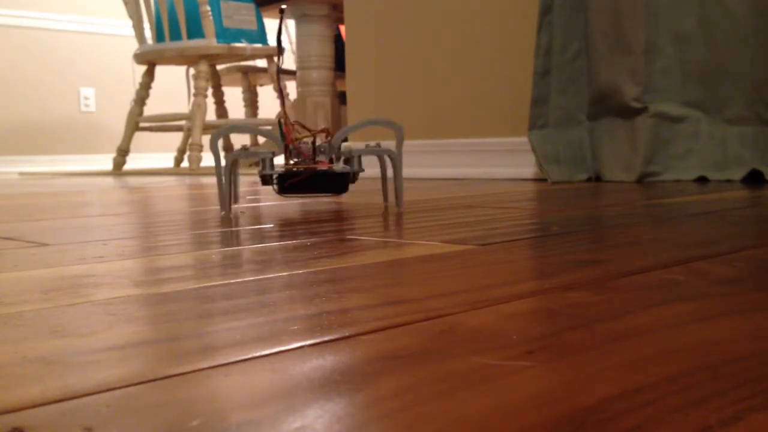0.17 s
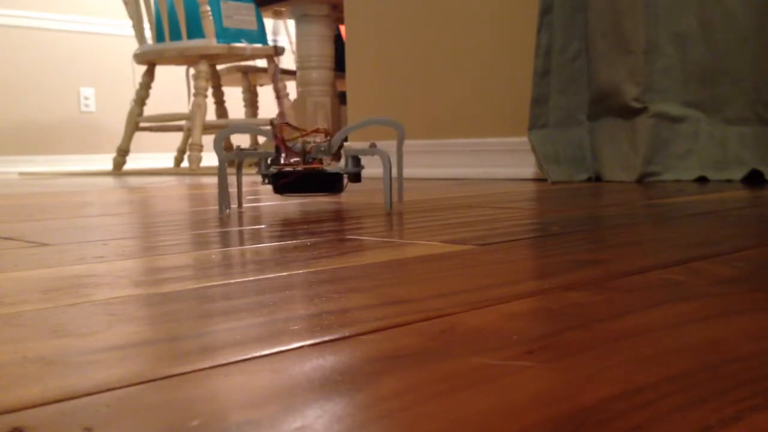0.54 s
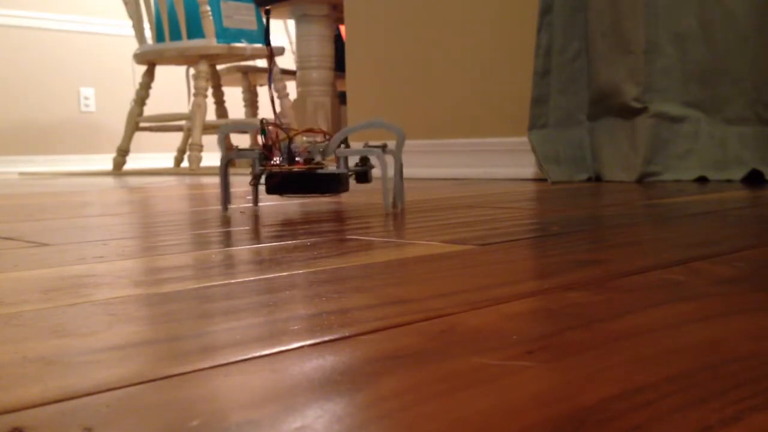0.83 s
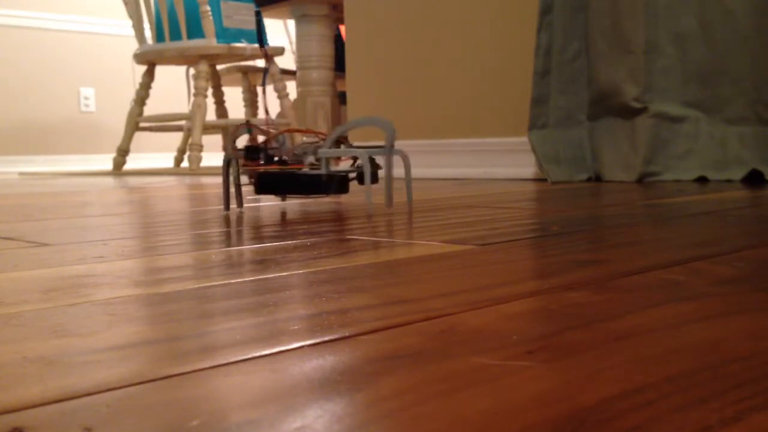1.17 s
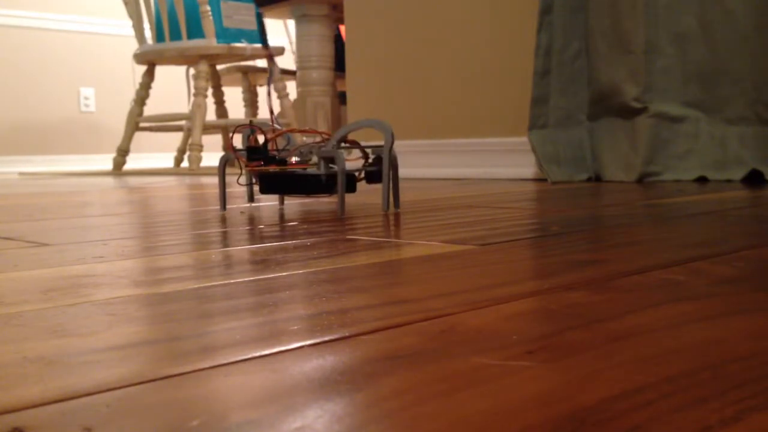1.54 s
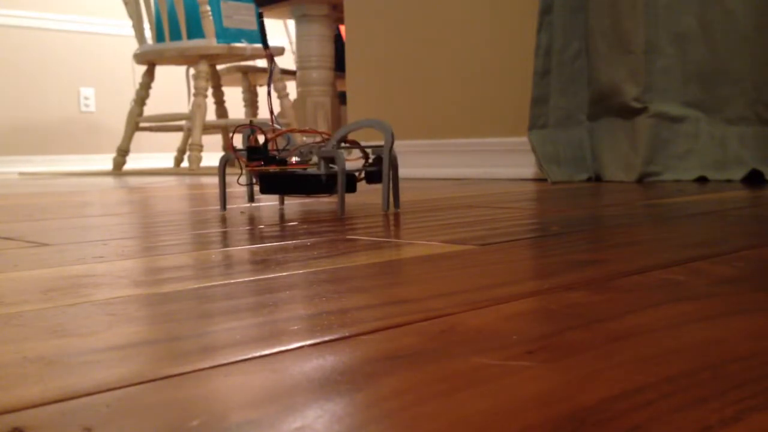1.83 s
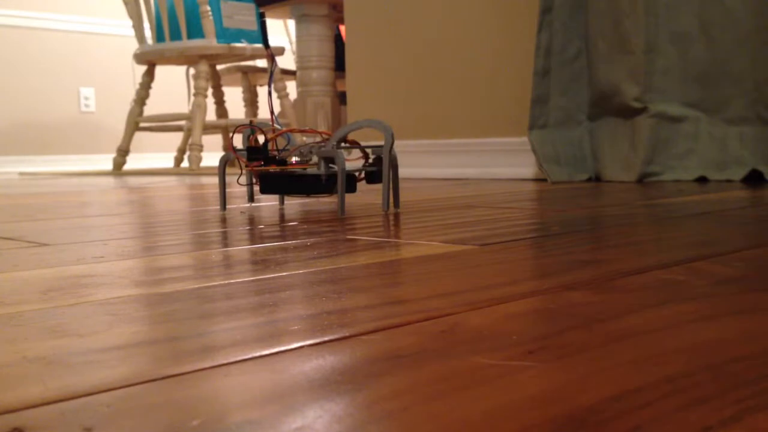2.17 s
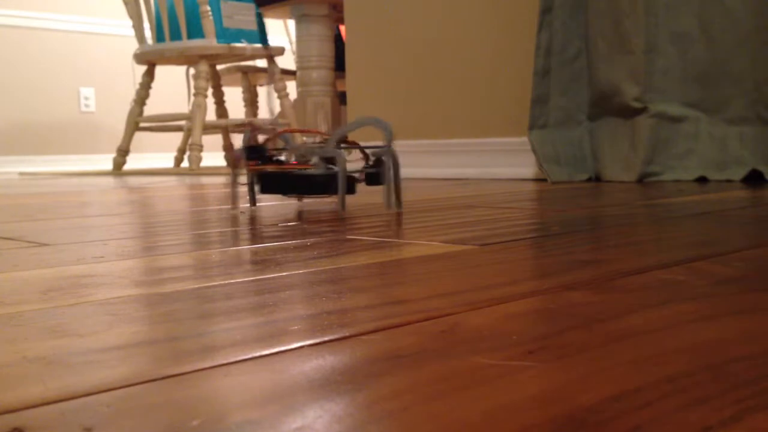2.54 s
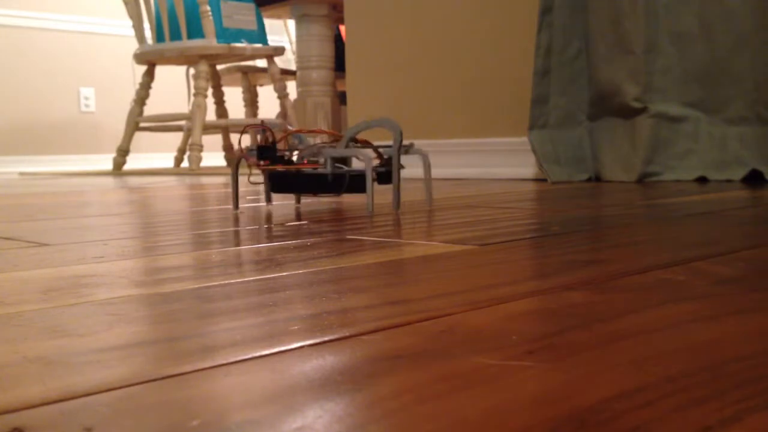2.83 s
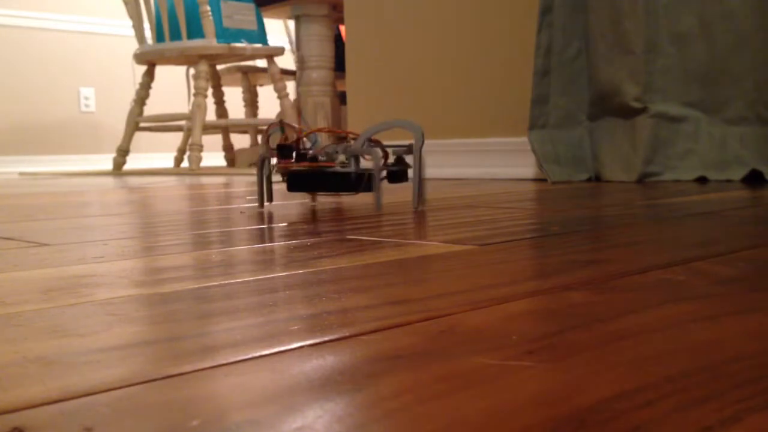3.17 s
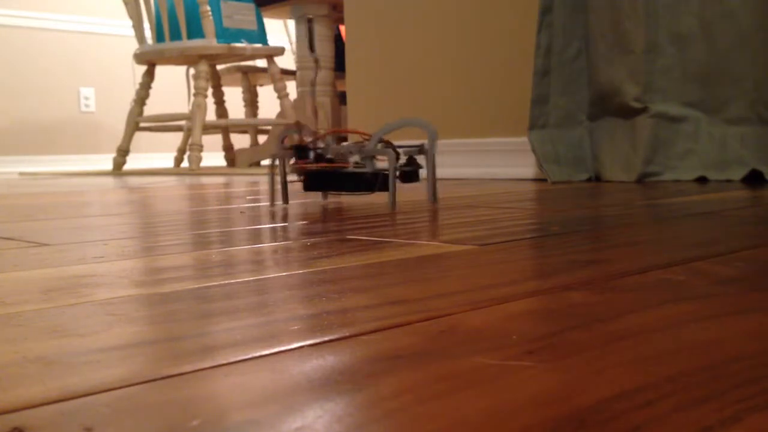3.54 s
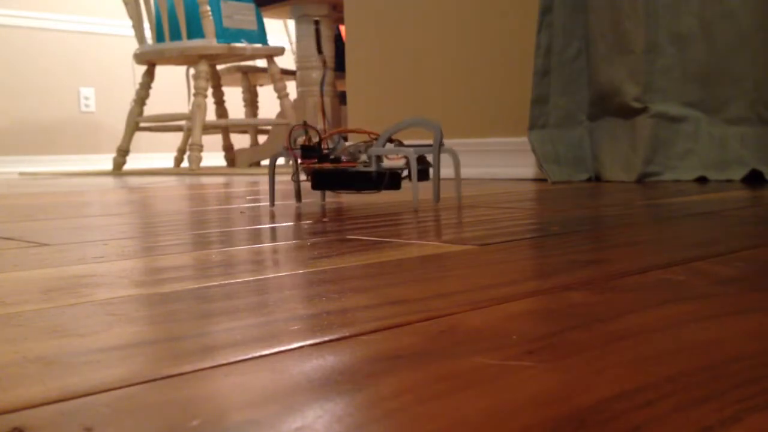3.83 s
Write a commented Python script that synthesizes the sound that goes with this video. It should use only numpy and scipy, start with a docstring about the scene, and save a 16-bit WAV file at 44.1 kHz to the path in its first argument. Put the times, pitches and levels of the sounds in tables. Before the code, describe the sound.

A small walking robot's servos rasp and whine in quick bursts, with light foot knocks on a wooden floor. It rests, ticking faintly, then walks on more strongly with a brief clatter, in a softly humming, slightly echoing room.

```python
"""A small robot walks on wood

A four-legged robot walks, rests for a moment and walks on more strongly. In each stroke a servo
(a geared motor) speeds up and slows down: its teeth rattle and whine, and scrape once per gear turn.
The servos also twitch, squeak and tick. Knocks ring in the floorboards; the room hums and echoes."""
import sys
import numpy as np
from scipy import signal
from scipy.fft import rfft, irfft, next_fast_len
from scipy.io import wavfile
from scipy.ndimage import uniform_filter1d, map_coordinates

SR = 44100
rng = np.random.default_rng(int(sys.argv[2]) if len(sys.argv) > 2 else 0)


def bounce(signal):
    """Save signal as a 16-bit WAV file at the path given by the first command-line argument."""
    frames = np.transpose(np.atleast_2d(signal))
    limited = np.clip(frames, -1, 1)
    pcm = np.round(limited * 32767).astype(np.int16)
    wavfile.write(sys.argv[1], SR, pcm)


N = 176400
KNOCK_RISE_S = 0.0018  # a soft contact takes a moment to build up


def amp(db):
    """Turn decibels into a number to multiply by."""
    return 10 ** (np.asarray(db) / 20)


def unit(x):
    """Scale a signal to an average power of 1."""
    return x / np.sqrt(np.mean(x ** 2) + 1e-20)


def along(points, hz):
    """Read a curve of (pitch_hz, value) points, with pitch on a log scale."""
    pitches, values = np.transpose(points)
    return np.interp(np.log(hz + 1), np.log(pitches + 1), values)


def wobble(rate):
    """A smooth curve through `rate` random values a second."""
    return map_coordinates(rng.standard_normal(int(N * rate / SR) + 4), [np.arange(N) * rate / SR])


def filtered(x, response):
    """Turn each frequency up or down by response(hz)."""
    size = next_fast_len(N + SR // 2)
    return irfft(rfft(x, size) * response(np.fft.rfftfreq(size, 1 / SR)), size)[:N]


def coloured(x, *colours):
    """Shape the tone with (pitch_hz, level_db) curves; white noise keeps its power."""
    size = 8192
    hz = np.fft.rfftfreq(size, 1 / SR)
    gain = unit(amp(sum(along(colour, hz) for colour in colours)))
    # fold the filter so that it rings only after a sound, never before
    cepstrum = irfft(np.log(gain + 1e-6))
    cepstrum[1:size // 2] *= 2
    cepstrum[size // 2 + 1:] = 0
    return signal.fftconvolve(x, irfft(np.exp(rfft(cepstrum))))[:N]


def add(track, start_s, sound):
    """Mix a sound into a track."""
    i = round(start_s * SR)
    track[i:i + len(sound)] += sound[:N - i]


def swells(rows):
    """A loudness curve made of bell-shaped bumps."""
    t = np.arange(N) / SR
    return sum(amp(db) * np.exp(-.5 * ((t - peak_s) / width) ** 2) for peak_s, width, db in rows)


def background():
    """A slightly wavering household hum over soft room noise."""
    # hum tones: pitch_hz, level_db
    tones = [(60, -69.5), (91, -62.5), (120, -59)]
    # colour of the room noise: pitch_hz, level_db
    air = [(15, -34), (25, -35), (43, -18), (125, -5), (146, -10.5), (191, -5.5), (213, -14.5), (344, -12),
           (501, -21.5), (1060, -25.5), (1280, -29), (1540, -29.5), (2780, -32.5), (4260, -32),
           (15000, -39)]
    t = np.arange(N) / SR
    hum = sum(amp(db) * np.sqrt(2) * np.sin(2 * np.pi * hz * t + 0.43 * wobble(3.74)) for hz, db in tones)
    return hum + amp(-56.5 + 1.53 * wobble(11.9)) * coloured(rng.standard_normal(N), air)


def rumbles_and_rustles():
    """Low floor rumbles and faint rustles: noise that swells and fades."""
    # rumbles: peak_s, half_width_s, level_db
    rumbles = [(.43, 0.061, -56.5), (1.205, 0.035, -49)]
    # their colour: pitch_hz, level_db
    rumble_colour = [(25, -20), (55, -1), (135, 1), (220, -14), (500, -36), (2000, -67)]
    # rustles: peak_s, half_width_s, level_db
    rustles = [(1.935, 0.015, -64), (2.12, 0.033, -58), (3.94, 0.03, -53)]
    # their colour: pitch_hz, level_db
    rustle_colour = [(100, -21), (350, 8), (600, 0), (1000, -3.5), (2200, -5), (3200, -16), (10000, -33)]
    rumble = swells(rumbles) * coloured(rng.standard_normal(N), rumble_colour)
    return rumble + swells(rustles) * coloured(rng.standard_normal(N), rustle_colour)


def room_echo(x):
    """Dense early echoes from the walls, and a tail that dies soonest in the treble."""
    # pitch_hz, fade_s (the time to fall by 60 dB)
    fades = [(200, 0.48), (2000, 0.77), (8000, 0.32), (15000, 0.14)]
    tail_db, early_db, early_fade_s = -10, -9, 0.026
    hz, t, noise = signal.stft(rng.standard_normal((2, SR // 2)), SR, nperseg=256)
    tail = signal.istft(noise[0] * amp(-60 * t / along(fades, hz)[:, None]), SR, nperseg=256)[1]
    early = signal.istft(noise[1] * amp(-60 * t / early_fade_s), SR, nperseg=256)[1]
    echo = amp(tail_db) * tail / np.linalg.norm(tail) + amp(early_db) * early / np.linalg.norm(early)
    return signal.fftconvolve(x, np.pad(echo, (SR // 500, 0)))[:N]  # 2 ms late


def footfalls():
    """A foot lands squarely and its plank gives a short woody note."""
    # landings: start_s, pitch_hz, level_db
    landings = [(1.194, 581, -54), (1.224, 580, -52), (2.507, 530, -40), (3.34, 519.3, -47)]
    # tones of a plank: pitch_multiple, level_db, fade_s
    plank = [(1, 3.5, .18), (1.9, 0.5, 0.088), (2.28, -3, 0.15)]
    t = np.arange(SR // 2) / SR
    rise = 1 - np.exp(-t / KNOCK_RISE_S)
    notes = np.zeros(N)
    for start_s, hz, db in landings:
        ring = sum(amp(db + tone_db - 60 * t / fade_s) * np.sin(2 * np.pi * (k * hz * t + rng.random()))
                   for k, tone_db, fade_s in plank)
        add(notes, start_s, rise * ring)
    return notes


def knocks():
    """Each knock on the floor is a dull thud that rings the boards, and a harder clack."""
    # knocks: start_s, thud_db, clack_db
    hits = [(.632, -56, -45.5), (.703, -71, -54), (1.112, -52.5, -48.5), (1.178, -40.5, -55),
            (1.194, -38.5, -58), (1.224, -42.5, -45), (1.351, -72, -43.5), (2.476, -28.5, -51),
            (2.483, -31, -38), (2.507, -32.5, -25.5), (2.515, -33, -28), (2.543, -40, -31),
            (2.572, -38, -39), (2.592, -40.5, -36.5), (2.609, -35, -35), (2.622, -45, -36.5),
            (2.638, -38, -45), (2.664, -46.5, -42.5), (3.015, -55, -46.5), (3.257, -52.5, -45),
            (3.338, -45.5, -52), (3.353, -53, -42), (3.502, -60, -39.5), (3.513, -69, -60)]
    # tones of the floorboards: pitch_hz, level_db, fade_s
    boards = [(247.2, 2.5, 0.45), (347, -6, 0.18), (369.5, 5, 0.26), (434.5, -2.5, 0.35), (534, -12, .3),
              (653, -3, 0.29), (696, -8, .3), (720, -8.5, 0.34), (865, -2, 0.23), (970, -12, 0.15)]
    # colour of a thud: pitch_hz, level_db
    thud_colour = [(70, -22), (190, -4), (250, -2), (305, -5), (370, 1.5), (480, -1.5), (600, -3),
                   (720, -4.5), (950, -8.5), (1150, -13), (2500, -22), (8000, -50)]
    # colour of a clack: pitch_hz, level_db
    clack_colour = [(200, -29), (700, -8.5), (950, 4.5), (1120, -9), (1350, -0.5), (1900, -3.5),
                    (2400, 3.5), (3100, -11), (4200, -6.5), (7000, -12), (15000, -50)]
    thud_fade_s, clack_fade_s, ring_db = 0.088, 0.071, -5
    t = np.arange(SR // 2) / SR
    thuds, clacks, rings = np.zeros((3, N))
    rise = 1 - np.exp(-t / KNOCK_RISE_S)
    for start_s, thud_db, clack_db in hits:
        add(thuds, start_s, rise * amp(thud_db - 60 * t / thud_fade_s) * rng.standard_normal(len(t)))
        add(clacks, start_s, rise * amp(clack_db - 60 * t / clack_fade_s) * rng.standard_normal(len(t)))
        ring = sum(amp(db + rng.normal(0, 1.9) - 60 * t / fade_s)
                   * np.sin(2 * np.pi * (hz * t + rng.random())) for hz, db, fade_s in boards)
        add(rings, start_s, rise * amp(thud_db + ring_db) * ring / np.abs(ring).max())
    return coloured(thuds, thud_colour) + coloured(clacks, clack_colour) + rings


def ticks():
    """Control pulses keep giving the servos tiny kicks, heard best while the robot rests."""
    # colour of a tick: pitch_hz, level_db
    colour = [(500, -10.5), (2200, 5), (2900, -9.5), (4100, 3.5), (5700, -7), (6400, -10.5), (6750, 5),
              (7200, -7), (9300, -5), (9700, 0), (10500, -8), (15000, -11)]
    pulses = [(.002, 5.5), (.0085, 1.5), (0.016, -7)]  # delay_s, level_db
    pulses_per_s, tick_s, level_db = 49.7, 0.002, -68.5
    t = np.arange(N) / SR
    kicks = sum(amp(db) * np.exp(-((t - delay_s) % (1 / pulses_per_s)) / tick_s) for delay_s, db in pulses)
    ticking = kicks * amp(1.4 * wobble(77)) * rng.standard_normal(N)
    return amp(level_db) * unit(coloured(ticking, colour))


def squeaks():
    """Now and then a gear case chirps roughly around the pitch it rings at most."""
    # chirps: peak_s, half_width_s, level_db
    chirps = [(.452, 0.015, -46), (.665, 0.013, -53), (.72, .014, -55), (.96, 0.0031, -39.5),
              (3.588, .005, -47.5)]
    pitch_hz = 2850 * (1 + .03 * wobble(1200) + .02 * wobble(80))
    return swells(chirps) * np.sin(2 * np.pi * np.cumsum(pitch_hz) / SR)


def gear_whine(pitch_hz):
    """Several servos turn unsteadily at nearly the same speed; their meshing teeth whine roughly."""
    # servos moving together: speed_multiple, level_db
    legs = [(.92, -6), (.99, 1), (1.055, -2)]
    # tones of the meshing gears: pitch_multiple, level_db
    tones = [(.5, -18), (1, 1.5), (1.6, -1.5)]
    t = np.arange(len(pitch_hz)) / SR

    def unsteady(rate):
        return np.interp(t * rate, np.arange(SR // 20), rng.standard_normal(SR // 20))

    whine = np.zeros(len(t))
    for speed, leg_db in legs:
        waver = 1 + 0.0224 * unsteady(901) + .038 * unsteady(130)  # fast flutter, slower drag
        cycles = np.cumsum(pitch_hz * speed * waver) / SR
        whine += sum(amp(leg_db + db) * np.sin(2 * np.pi * k * cycles) for k, db in tones)
    return unit(whine)


def tooth_rattle(turns):
    """Gear teeth click with uneven size and spacing over smooth rubbing."""
    clicks_per_turn, scatter_db, rub_db, clump_db = 30, 2.5, 6.5, 4.5
    tooth = np.floor(turns * clicks_per_turn + .25 * wobble(600))
    sizes = amp(scatter_db * np.clip(rng.standard_normal(N), -2, 2))
    clicks = (np.diff(tooth, prepend=0) > 0) * sizes * rng.choice([-1, 1], N)
    chatter = signal.stft(unit(clicks) + amp(rub_db) * rng.standard_normal(N), nperseg=256)[2]
    # each clump of chatter gets its own colour
    clumps = uniform_filter1d(rng.standard_normal(chatter.shape), size=4, axis=0)
    clumps = uniform_filter1d(clumps, size=4, axis=1)
    chatter *= amp(clump_db * np.clip(unit(clumps), -2, 2))
    return unit(signal.istft(chatter, nperseg=256)[1][:N])


def servos():
    """As a servo speeds up, its rattle, scrape and whine grow louder and the whine rises."""
    # strokes: start_s, fastest_s, end_s, base_db, top_turns_per_s, scrape_db, whine_db, whine_hz, bright_db
    strokes = [(-.12, -0.01, .045, -41, 55, -7, -6, 5300, 5),
               (0.102, 0.209, .264, -40, 62, -7, -13, 5920, 6),
               (.332, 0.46, .53, -41.5, 54, 0, -3.5, 5640, 3),
               (0.599, 0.7, .765, -39, 62, -11, -17, 5600, 4.5),
               (0.831, .952, 1.03, -40, 54, 0, -2, 5650, 2.5),
               (1.1, 1.202, 1.265, -37, 58, -2, -7.5, 5740, -0.5),
               (1.335, 1.448, 1.482, -40.5, 56, 0.5, 1.5, 5460, 7),
               (2.367, 2.42, 2.495, -36.5, 68, -15, -1, 6400, 3),
               (2.493, 2.576, 2.65, -32, 61, 3.5, -12, 5420, -1),
               (2.719, 2.816, 2.908, -35.5, 56, -2.5, -2.5, 5350, 2.5),
               (2.982, 3.068, 3.152, -37, 64, 4.5, -1, 5130, 2.5),
               (3.22, 3.337, 3.402, -36, 54, 2.5, -2, 5420, 1),
               (3.482, 3.569, 3.645, -39.5, 63, 6, 4, 5600, 2),
               (3.735, 3.835, 3.9, -33, 55, -1.5, -8.5, 5110, -3),
               (3.958, 4.053, 4.14, -33.5, 58, -8, -4.5, 5610, -4)]
    # tiny servo movements: peak_s, level_db
    twitches = [(.004, -39), (.060, -48), (0.084, -49.5), (.121, -44), (.142, -45), (.242, -39.5),
                (.322, -45.5), (.564, -51), (.609, -49), (.635, -45), (0.702, -39.5), (.752, -40),
                (0.8, -47), (.905, -37), (1.065, -45), (1.133, -41), (1.301, -44), (1.353, -41.5),
                (1.417, -34), (1.472, -37.5), (2.365, -45), (2.676, -44.5), (2.73, -41), (2.779, -37),
                (2.879, -35), (2.943, -38.5), (2.987, -36.5), (3.014, -31.5), (3.119, -38), (3.175, -43),
                (3.23, -43), (3.446, -41), (3.491, -36), (3.514, -34), (3.982, -31.5)]
    # colour of the gear cases in the first walk: pitch_hz, level_db
    first_case = [(530, -45), (900, -15), (1170, -13), (1460, -8.5), (1670, -18), (1940, -10), (2410, -7),
                  (2810, -5.5), (3050, -9), (3480, -7.5), (4150, -5), (4620, -1), (6520, -3), (7880, -2),
                  (10200, -8), (12800, -4.5), (15300, -13)]
    # and in the second walk: pitch_hz, level_db
    second_case = [(530, -47), (900, -13.5), (990, -9), (1210, -16.5), (1400, -9), (1610, -17), (1990, -14),
                   (2520, -8.5), (2740, -11), (3280, -12), (4000, -5.5), (4620, -3.5), (5200, -2),
                   (6290, -2), (8760, -3), (10100, -3), (13000, -4.5), (15300, -17)]
    # colour that all cases share: pitch_hz, level_db
    shared_case = [(100, -24), (300, 2), (600, -4.5), (1000, -3), (1800, 2.5), (2800, 1.5), (3400, 2),
                   (5000, -0.5), (11000, 2.5), (11900, 1), (13000, 2.5), (14000, -5.5)]
    # colour of the whine: pitch_hz, level_db
    whine_colour = [(1900, -8), (2550, -7), (3150, -14), (4000, -1.5), (4600, 2), (5700, 1), (6500, 1),
                    (9200, 3), (11000, -8)]
    # colour of the scrape: pitch_hz, level_db
    scrape_colour = [(300, -22.5), (2000, -12), (4000, -15.5), (4600, -0.5), (6100, -4), (7200, 0.5),
                     (8700, 3.5), (10000, -3), (12800, -8.5), (15000, -14.5)]
    walks = [(-.1, 1.48), (2.357, 4.1)]  # start_s, end_s
    attack_s, release_s, twitch_s = 0.00053, 0.0046, 0.0029
    swell_db, hold_db = 8.5, -54
    slowest, lowest_pitch, pitch_dip = 0.701, .76, 0.0809  # shares of full speed or pitch
    t = np.arange(N) / SR
    grind, bright, scrape, whine = np.zeros((4, N))
    for start, fastest, end, db, top_rate, scrape_db, whine_db, whine_hz, bright_db in strokes:
        i = np.flatnonzero((t > start) & (t < end + .1))
        effort = np.sin(np.pi * np.interp(t[i], [start, fastest, end], [0, .5, 1]))
        turns = np.cumsum(top_rate * (slowest + (1 - slowest) * effort)) / SR
        turns -= np.interp(fastest, t[i], turns)  # one scrape falls on the fastest moment
        edges = (1 - np.exp(-(t[i] - start) / attack_s)) * np.exp(-np.maximum(t[i] - end, 0) / release_s)
        swell = amp(swell_db * (effort - 1.5))
        level = amp(db) * edges * swell
        grind[i] += level
        bright[i] += level * (amp(bright_db) - 1)
        # once per turn the gear scrapes through a tight spot and the whine dips
        tight_spot = 1 / (1 + (((turns + .5) % 1 - .5) / .21) ** 4)
        scrape[i] += amp(db + scrape_db) * edges * swell ** 1.33 * unit(tight_spot)
        pitch_hz = whine_hz * (lowest_pitch + (1 - lowest_pitch) * effort)
        pitch_hz *= 1 - pitch_dip * (tight_spot - .5)
        whine[i] += amp(db + whine_db) * edges * swell ** .9 * gear_whine(pitch_hz) / 2
    for start, end in walks:  # loaded servos keep buzzing between strokes
        grind = np.hypot(grind, amp(hold_db) * ((t > start) & (t < end)))
    for peak_s, db in twitches:
        scrape = np.hypot(scrape, swells([(peak_s, twitch_s, db)]))
    steady_turns = np.mean(strokes, axis=0)[4] * t  # teeth click at the average top speed
    teeth = tooth_rattle(steady_turns)
    treble = filtered(bright * teeth, lambda hz: along([(6000, 0.17), (11000, 1.0)], hz))
    gears = grind * teeth + treble
    first_walk = t < walks[1][0]
    cases = coloured(gears * first_walk, first_case[1:-1], shared_case)
    cases += coloured(gears * ~first_walk, second_case[1:-1], shared_case)
    scraping = scrape * amp(wobble(60)) * tooth_rattle(steady_turns)
    return cases + coloured(whine, whine_colour) + coloured(scraping, scrape_colour)


def scene():
    """The robot and its echo, over soft rumbles, rustles and hum."""
    robot = servos() + squeaks() + ticks() + knocks() + footfalls()
    stirrings = rumbles_and_rustles()
    return (amp(-1) * (robot + room_echo(robot)) + stirrings + background())[None]


def record(dry):
    """Cut away the very highest treble."""
    return filtered(dry[0], lambda hz: hz < 15480)[None]


dry = scene()
out = record(dry)
bounce(out)
```